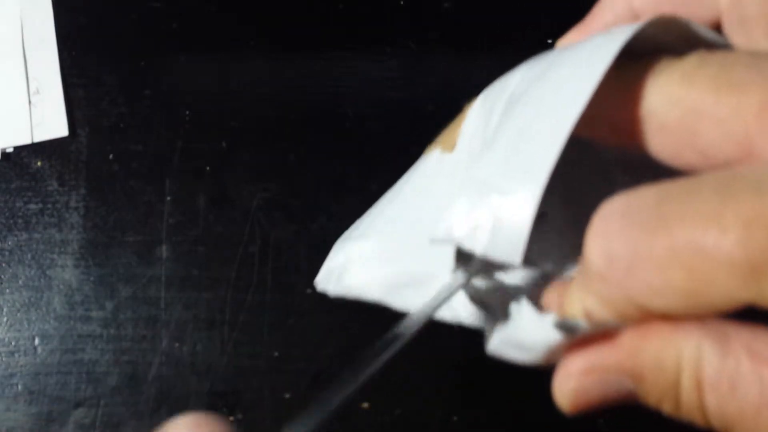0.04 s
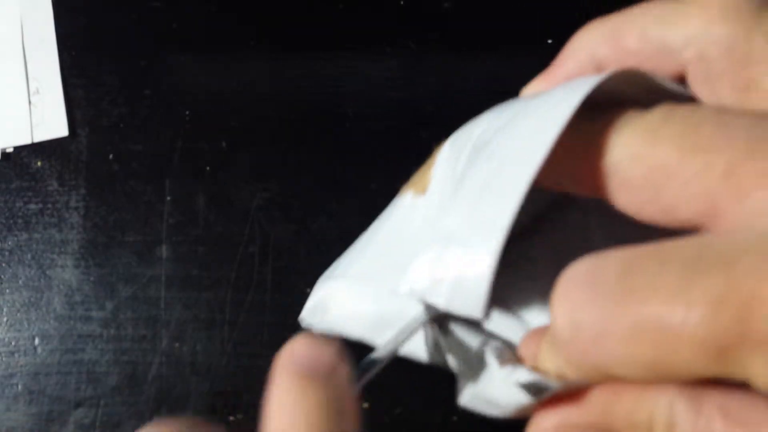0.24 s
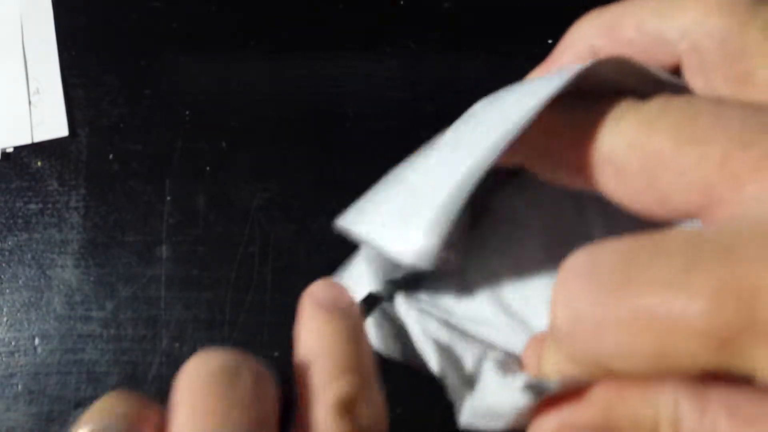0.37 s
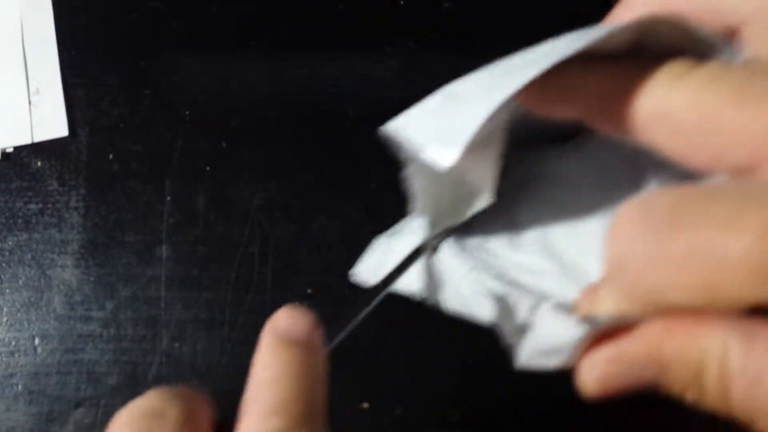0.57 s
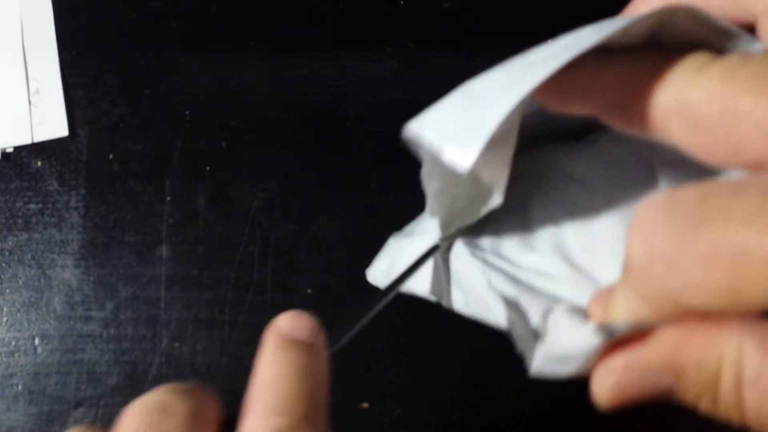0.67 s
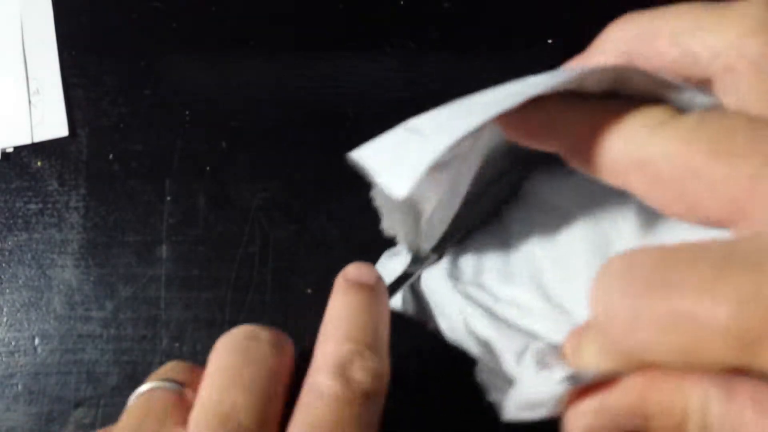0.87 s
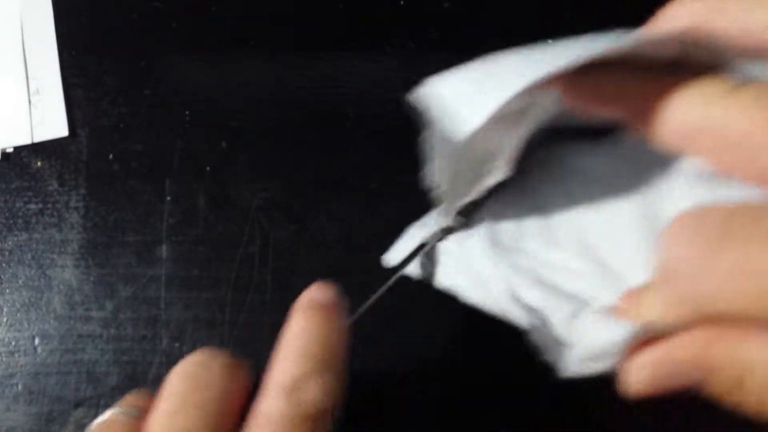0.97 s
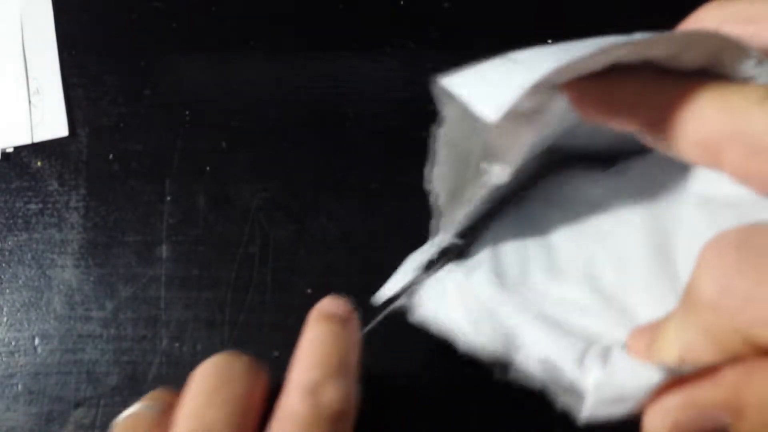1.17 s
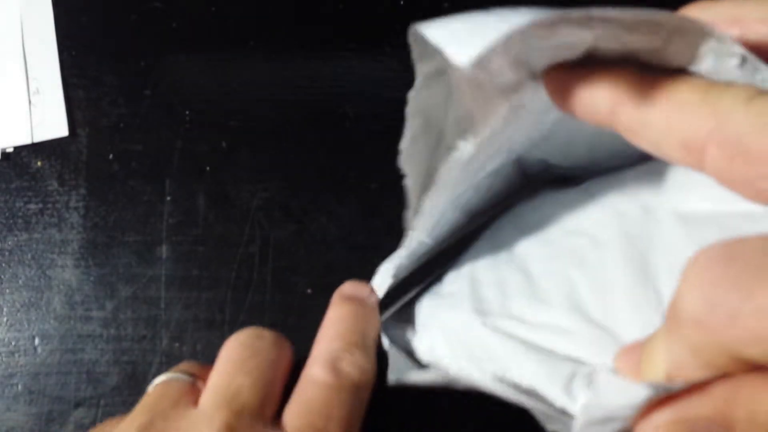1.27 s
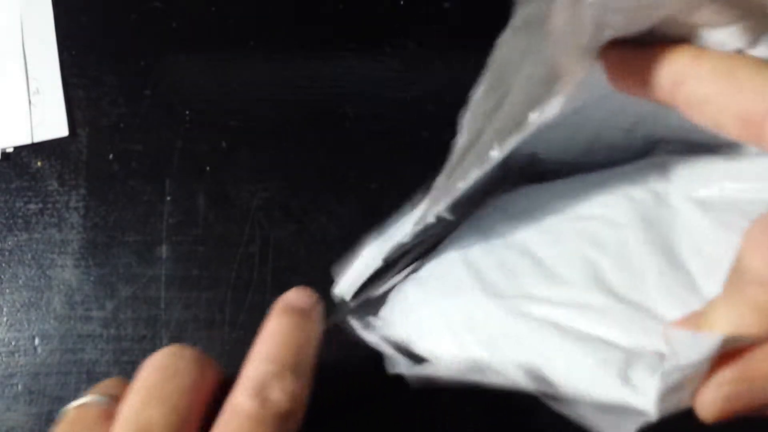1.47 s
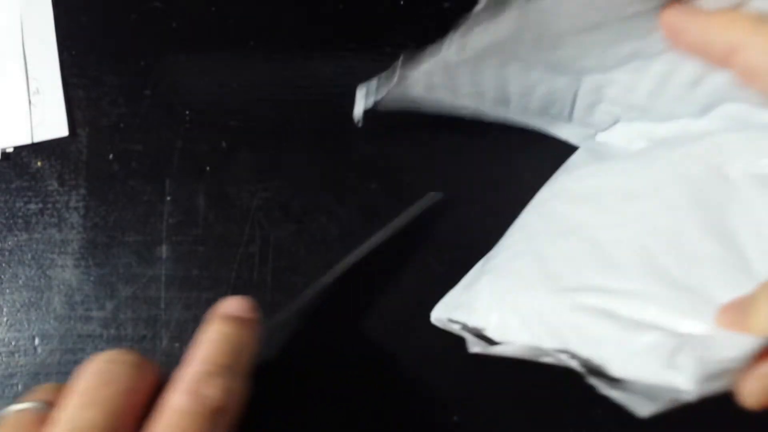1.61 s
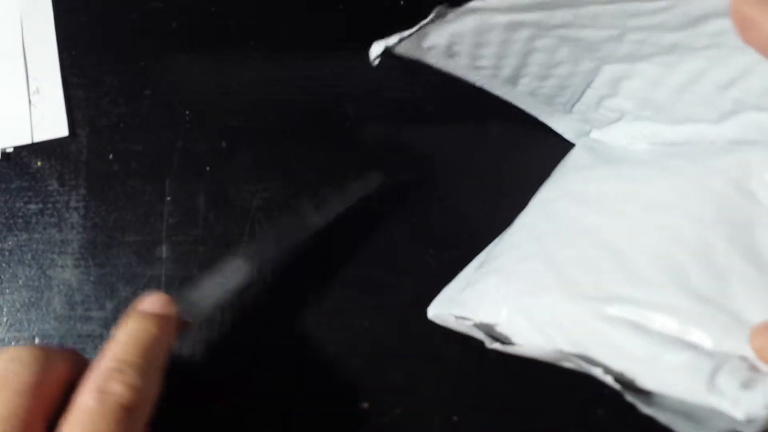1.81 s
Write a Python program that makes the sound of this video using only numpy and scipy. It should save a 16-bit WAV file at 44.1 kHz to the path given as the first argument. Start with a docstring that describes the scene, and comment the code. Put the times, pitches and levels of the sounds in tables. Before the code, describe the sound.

A stiff padded plastic mailer is slit and pulled open on a desk, heard very close in a small room: faint crackle first, then sharp bursts of snaps and hollow pops, ending with a dull knock.

```python
"""A padded plastic mailer is slit with a knife and pulled open on a desk, close by, in a small room.
A faint hush lasts throughout. The first pulls crackle softly; then creases snap in the stiff film,
whole panels buckle with hollow pops and the bag bumps the desk, over crackle, rasp and rumble.
Near the end the blade breaks through the seam with a knock, and a last faint snap follows.
Snaps are shaped noise bursts, pops and bumps decaying sines, and the pulls trains of random clicks."""
import sys
import numpy as np
from scipy import signal
from scipy.fft import rfft, irfft, next_fast_len
from scipy.io import wavfile

SR = 44100
rng = np.random.default_rng(int(sys.argv[2]) if len(sys.argv) > 2 else 0)


def output_pcm(signal):
    """Save a mono or channel-first signal as 16-bit PCM at the path in sys.argv[1].

    Samples are clipped to [-1, 1] before scaling.
    """
    pcm = np.clip(np.atleast_2d(signal).T, -1, 1) * 32767
    wavfile.write(sys.argv[1], SR, np.round(pcm).astype(np.int16))


N = 81585  # samples

# Snapping creases: start_s, relative_level_db, relative_crack_db, decay_s
CREASE_SNAPS = [(0.0277,-31.5,-13,0.0039), (0.045,-29,-5.5,0.0021), (0.2057,-9.5,2.5,.004),
                (0.2291,-9,-2.5,0.0047), (0.2354,-9.5,-4.5,0.0075), (0.2397,-13,2,0.007),
                (0.2656,-8.5,-1,0.0041), (0.278,-14,3,0.0018), (0.3158,-19,12,0.0034),
                (0.331,-25,3.5,0.0034), (0.3384,-15,4,0.0058), (0.35,-25,-8.5,.0005),
                (0.3913,-12.5,-7.5,0.0013), (0.3938,-16,0.5,0.0052), (0.4279,-16.5,2.5,0.006),
                (0.4624,-14,-10,0.0015), (0.4655,-12.5,-10,0.0015), (0.4733,-15,-2,.001),
                (0.5106,-18,-11,0.0021), (0.5234,-15.5,-11.5,0.0021), (0.5377,-14,-8,0.0028),
                (0.55,-15,-4,0.0011), (0.603,-21,-19,0.0017), (0.6705,-14.5,-12,0.0017),
                (0.6785,-22,0,0.0026), (0.712,-26.5,-20,0.00062), (0.762,-10,-11.5,0.0023),
                (0.7751,-8.5,-32,0.0012), (0.7791,-19,-21,.001), (0.7965,-9.5,-10,0.0048),
                (0.806,-10.5,-12,0.0028), (0.8197,-11.5,-3,0.0043), (0.8444,-12.5,2,0.0044),
                (0.8515,-11.5,-7.5,0.0011), (0.869,-12,-28,.0007), (0.8872,-12,-6.5,0.00076),
                (0.968,-15,-20,0.0017), (0.9877,-15,-4.5,.0012), (1.001,-10,-2,0.0046),
                (1.0277,-12,-4,0.0036), (1.0547,-14,-18.5,0.0037), (1.1695,-28,3,0.00022),
                (1.186,-35,-12,.0003), (1.216,-12.5,-7,0.0012), (1.2303,-16.5,-4.5,0.0013),
                (1.244,-8,-13,0.0042), (1.25,-14.5,-13,.0007), (1.264,-6,-14,0.0068),
                (1.2695,-11.5,-26,.0012), (1.283,-11,-30,0.0031), (1.2942,-12.5,-5.5,0.0034),
                (1.2999,-14.5,-2.5,0.0018), (1.365,-21.5,-29,0.0021), (1.5566,-21,4,0.0018),
                (1.5886,-30,-2,0.003), (1.638,-24,-7.5,0.0078), (1.7304,-32.5,-7.5,.001)]
# Level of the top treble in the snaps over time: time_s, relative_level_db
SNAP_EDGE = [(0.27,-11.5), (0.46,-21), (0.67,-7.5), (0.77,-27), (1.05,-11), (1.17,3), (1.27,-7.5)]
# Buckling panels: start_s, relative_level_db, pitch_hz, swell_s
PANEL_POPS = [(0.206,-15,1953,0.0013), (0.267,-25,1050,.003), (0.317,-16,820,0.0023),
              (0.338,-21.5,892,0.0046), (0.43,-25.5,1084,0.0033), (0.462,-21.5,877,0.002),
              (0.5522,-15,1010,0.0015), (0.579,-21,1097,0.0064), (0.607,-19.5,520,0.0037),
              (0.822,-17.5,818,0.0043), (0.84,-15.5,839,0.008), (0.855,-19.5,1100,0.0041),
              (0.956,-20.5,860,0.0017), (0.968,-14.5,910,0.0026), (0.9995,-13,660,0.0033),
              (1.011,-15,1003,.002), (1.019,-14,910,0.0015), (1.027,-8.5,858,0.0023),
              (1.052,-16.5,634,0.0022), (1.053,-15,1223,0.0027), (1.216,-20,1160,0.0032),
              (1.231,-22,850,0.0018), (1.245,-21,1200,0.0035), (1.253,-23.5,907,0.0032),
              (1.269,-22,903,0.0046), (1.283,-22,1215,.003), (1.301,-16.5,1003,0.0016),
              (1.526,-25.5,854,.0025), (1.553,-27,907,0.0013)]
# Bag against desk: start_s, relative_level_db, pitch_hz
DESK_BUMPS = [(0.227,-25,158), (0.314,-28,385), (0.375,-24,194), (0.421,-23.5,294), (0.433,-21,278),
              (0.463,-21,275), (0.554,-18,240), (0.561,-24,115), (0.577,-17,273), (0.589,-22,254),
              (0.608,-22.5,219), (0.67,-24,265), (0.747,-29,224), (0.955,-23,272), (1.007,-16.5,224),
              (1.034,-23,153), (1.054,-18.5,255), (1.075,-30.5,265), (1.362,-43,182), (1.395,-36,198),
              (1.526,-28,216), (1.549,-20.5,200)]
# Partials as the blade breaks through the end of the seam: pitch_hz, relative_level_db
SEAM_KNOCK = [(310,0), (651,-3), (980,-0.5), (1460,-5), (1830,-7.5), (2440,-9)]
# Pulls on the bag: start_s, end_s, relative crackle_db, rasp_db, rumble_db
BAG_PULLS = [(0.02,0.069,-49,-47,-53.5),(0.117,0.214,-48.5,-51.5,-59),(0.211,0.293,-37,-37.5,-39.5),(0.341,0.348,-26.5,-50,-34.5),(0.391,0.451,-27.5,-33,-38),
             (0.538,0.638,-36.5,-34.5,-36.5),(0.676,0.724,-39,-59,-50),(0.765,0.826,-32.5,-32.5,-38),(0.812,0.89,-30,-32,-41.5),(0.953,0.991,-33,-37,-36.5),
             (0.995,1.052,-28.5,-31,-34.5),(1.168,1.216,-43.5,-52,-51),(1.246,1.309,-26.5,-39,-42.5),(1.3,1.344,-39,-61,-52),(1.402,1.476,-38,-49.5,-67),(1.531,1.602,-35,-37,-44.5)]
# Spectrum of the stiff film, in ticks and crackle: frequency_hz, relative_density_db
FILM_SPECTRUM = [(40,-27),(600,-22),(2000,-6),(3500,-7),(5000,-3.5),(6700,-0.5),(8200,-5.5),(11000,-8.5),(13500,-12),(15500,-11.5)]
# Spectrum of the lower part of a snap: frequency_hz, relative_density_db
CRACK_SPECTRUM = [(40,-70),(450,-9.5),(1100,0.5),(1500,-7.5),(1950,0),(2700,-10.5),(3700,-8),(5000,-10.5),(10000,-20.5)]
# Spectrum of the bag under the rasping blade: frequency_hz, relative_density_db
BAG_SPECTRUM = [(40,-50.5),(260,-14),(450,-7.5),(800,0.5),(1150,-1.5),(1500,-1.5),(2000,-6),(3000,-7),(8000,-32)]
# Spectrum of the bag rumbling on the desk: frequency_hz, relative_density_db
RUMBLE_SPECTRUM = [(25,-26),(60,-10),(110,-7),(200,-4),(450,-7.5),(1200,-27)]
# Resonances of the hollow bag: frequency_hz, gain_db
HOLLOW_MODES = [(260,-6),(680,-8),(765,-8),(885,-6),(995,-6),(1112,-6),(1272,-7),(1955,-3)]
# Stereo width, as gain of the side signal: frequency_hz, gain_db
SIDE_GAIN = [(60,-16),(300,-17),(700,-15),(1400,-6),(2800,-1),(6000,0)]
# Balance of the bag's place off centre: frequency_hz, left_minus_right_db
OFF_CENTRE = [(500,0.5),(1300,0.5),(2100,-4),(3300,-5),(5500,-11),(9000,-7.5),(15000,3.5)]
# Spectrum of the hush of the room: frequency_hz, relative_density_db
HUSH_SPECTRUM = [(25,-14),(60,-9.5),(110,-4),(230,-20.5),(1000,-25.5),(6000,-22.5),(16000,-33.5)]

EVENT_S, LEVEL_WINDOW_S = .08, .003  # length of one event; span over which its energy sets its level
SCATTER_DB, SCATTER_DECAY_S = -4, .009  # quick reflections from desk and hands
SNAP_DB, CRACK_DB = -11, 2  # offsets added to the table's levels
RING_HZ, RING_SPREAD = 6570, 0.1  # centre of the crease rings; spread as natural log of frequency
RING_WIDTH_HZ, RING_DB = 380, 0
POP_DB, BUMP_DB, KNOCK_DB = -4.5, -6, -22.5  # offsets added to the tables' levels
BUMP_SWELL_S, KNOCK_SWELL_S = 0.0036, 0.0029
KNOCK_S = 1.5872
BLUR_DB = -1.5  # narrow-band noise relative to the tone
PULL_ATTACK_S, PULL_RELEASE_S = 0.0078, 0.017  # exponential time constants
CRACKLE_PER_S, RASP_PER_S, RUMBLE_PER_S = 3500, 1500, 470  # mean clicks per second
HOLLOW_T60_S = .07
ROOM_DB, ROOM_T60_S = -9, 0.2
LEFT_LAG_S = .00004
HUSH_DB = -60  # rms of mid, and of side before its width is set
CUTOFF_HZ = 15600


def from_db(db):
    """Logarithmic scale: decibels become an amplitude gain."""
    return 10 ** (np.asarray(db) / 20)


def unit(x):
    """Normalisation: each channel is scaled to energy 1."""
    return x / np.sqrt(np.sum(x ** 2, axis=-1, keepdims=True) + 1e-20)


def colour(x, points, power=1):
    """Minimum phase: a causal filter is built from its magnitude by folding the cepstrum."""
    size = 2 * next_fast_len(x.shape[-1])
    hz, db = np.transpose(points)
    bins_hz = np.arange(size // 2 + 1) * SR / size
    curve_db = np.interp(np.log(bins_hz + 1), np.log(hz), db)
    cepstrum = irfft(np.log(from_db(curve_db * power)))
    cepstrum[1:size // 2] *= 2
    cepstrum[size // 2 + 1:] = 0
    response = np.exp(rfft(cepstrum))
    return irfft(rfft(x, size) * response)[..., :x.shape[-1]]


def resonate(x, hz, width_hz):
    """Damped resonance: a pole pair passes a narrow band, with gain 1 at its peak."""
    radius = np.exp(-np.pi * width_hz / SR)
    zeros = np.array([1, 0, -1]) * (1 - radius * radius) / 2
    poles = [1, -2 * radius * np.cos(2 * np.pi * hz / SR), radius * radius]
    return signal.lfilter(zeros, poles, x + 1e-18)


def burst(decay_s, spiky_db):
    """Stick-slip: a dying run of uneven micro-slips plus nearby reflections, as mid and side."""
    t = np.arange(int(EVENT_S * SR)) / SR
    slips, scatter = rng.standard_normal((2, 2, len(t)))
    uneven = from_db(spiky_db * np.clip(rng.standard_normal(len(t)), -2, 2))
    direct = unit(slips * uneven * np.exp(-t / decay_s))
    # the reflections are drawn anew for each spot on the bag
    reflections = unit(scatter * np.exp(-t / SCATTER_DECAY_S))
    return direct + from_db(SCATTER_DB) * reflections


def swing(hz, swell_s):
    """Damped vibration: a patch of bag swells into a few cycles, blurred by slips of the film."""
    t = np.arange(int(EVENT_S * SR)) / SR
    tone = unit(t * np.exp(-t / swell_s) * np.sin(2 * np.pi * hz * t))
    slips = burst(2 * swell_s, spiky_db=2)
    blur = unit(resonate(resonate(slips, hz, hz / 2), hz, hz))
    mid_only = np.array([[1], [0]])
    return unit(tone * mid_only + from_db(BLUR_DB) * blur)


def grains(per_s, spread_db, spectrum):
    """Random impulses: tiny clicks of uneven size excite a spectrum, as mid and side of rms 1."""
    happens = rng.random(N) < per_s / SR
    sizes = happens * from_db(spread_db * np.minimum(rng.exponential(1, N), 3))
    clicks = sizes * rng.choice([-1, 1], (2, N))
    return unit(colour(clicks, spectrum)) * np.sqrt(N)


def add(out, s, db, sound):
    """Superposition: a sound is added at its time, its level set for energy 1 in the level window."""
    i = max(int(s * SR), 0)
    gain = from_db(db) * np.sqrt(LEVEL_WINDOW_S * SR)
    out[:, i:i + sound.shape[1]] += gain * sound[:, :N - i]


def creases():
    """Snap-through: each crease gives a bright tick, short ring, thin top edge and lower crack."""
    out = np.zeros((2, N))
    for s, db, crack_db, decay_s in CREASE_SNAPS:
        slips = burst(decay_s, spiky_db=13)
        # each crease rings at a pitch of its own
        ring_hz = RING_HZ * np.exp(RING_SPREAD * rng.uniform(-1.05, 1))
        ring = unit(resonate(slips, ring_hz, RING_WIDTH_HZ))
        # the second difference tilts noise towards the treble
        edge = unit(np.diff(burst(decay_s, spiky_db=8), 2, prepend=np.zeros((2, 2))))
        edge_db = np.interp(s, *np.transpose(SNAP_EDGE))
        tick = unit(unit(colour(slips, FILM_SPECTRUM)) + from_db(RING_DB) * ring)
        crack = unit(colour(burst(2 * decay_s, spiky_db=3), CRACK_SPECTRUM))
        snap = tick + from_db(edge_db) * edge + from_db(CRACK_DB + crack_db) * crack
        add(out, s, db + SNAP_DB, snap)
    return out


def pops():
    """Buckling: each panel gives way and swings briefly at its own pitch."""
    out = np.zeros((2, N))
    for s, db, hz, swell_s in PANEL_POPS:
        add(out, s, db + POP_DB, swing(hz, swell_s))
    return out


def bumps():
    """Impact: the bag strikes the desk and gives a low damped vibration."""
    out = np.zeros((2, N))
    for s, db, hz in DESK_BUMPS:
        add(out, s, db + BUMP_DB, swing(hz, BUMP_SWELL_S))
    return out


def seam_knock():
    """Sudden release: the blade breaks through the seam and several partials sound at once."""
    out = np.zeros((2, N))
    for hz, db in SEAM_KNOCK:
        add(out, KNOCK_S, db + KNOCK_DB, swing(hz, KNOCK_SWELL_S))
    return out


def pulling():
    """Friction: each pull makes film crackle, blade rasp and bag rumble on the desk, then dies away."""
    t, power = np.arange(N) / SR, 0
    for start, end, *levels_db in BAG_PULLS:
        before, after = np.maximum(start - t, 0), np.maximum(t - end, 0)
        shape = np.exp(-before / PULL_ATTACK_S - after / PULL_RELEASE_S)
        power = power + np.outer(from_db(levels_db), shape) ** 2
    # overlapping pulls add in power
    crackle, rasp, rumble = np.sqrt(power) * from_db([[-4], [-4], [-3]])
    return (crackle * grains(CRACKLE_PER_S, 3.8, FILM_SPECTRUM)
            + rasp * grains(RASP_PER_S, 0.99, BAG_SPECTRUM)
            + rumble * grains(RUMBLE_PER_S, 0.33, RUMBLE_SPECTRUM))


def hollow(x):
    """Cavity resonance: the half-open bag rings on briefly after each push."""
    width_hz = np.log(1000) / (np.pi * HOLLOW_T60_S)  # bandwidth that gives a 60 dB decay in T60
    return x + sum(from_db(db) * resonate(x, hz, width_hz) for hz, db in HOLLOW_MODES)


def room(x):
    """Reverberation: the small room's tail is exponentially decaying noise, convolved with the sound."""
    t = np.arange(SR // 2) / SR
    envelope = np.clip(t / 0.0011, 0, 1) * from_db(-60 * t / ROOM_T60_S)
    tail = unit(rng.standard_normal((2, len(t))) * envelope)
    return x + from_db(ROOM_DB) * signal.fftconvolve(x, tail, axes=1)[:, :N]


def left_right(x):
    """Interchannel coherence: mid and side make two channels, alike in the bass, apart in the treble."""
    mid, side = x
    return mid + colour(side, SIDE_GAIN) * np.array([[1], [-1]])


def lean(left, right):
    """Interaural cues: off centre, most treble is louder on the right and the left lags slightly."""
    left = np.interp(np.arange(N) - LEFT_LAG_S * SR, np.arange(N), left)
    # half of the level difference goes to each side
    return np.array([colour(left, OFF_CENTRE, .5), colour(right, OFF_CENTRE, -.5)])


def hush():
    """Stationary noise: the hush of the room is random noise with a fixed spectrum."""
    noise = colour(rng.standard_normal((2, N)), HUSH_SPECTRUM)
    return left_right(from_db(HUSH_DB) * np.sqrt(N) * unit(noise))


def scene():
    """Source, resonator, room: the mailer rings in its own hollow, over the hush."""
    handling = creases() + pops() + bumps() + seam_knock() + pulling()
    mailer = lean(*left_right(room(hollow(handling))))
    return mailer + hush()


def record(dry):
    """Saturation and band limiting: the tallest peaks are rounded, then the top is cut."""
    top = .95
    rounded = top * np.tanh(dry / top)
    low_pass = signal.ellip(10, .1, 80, CUTOFF_HZ, fs=SR, output="sos")
    return signal.sosfilt(low_pass, rounded)


dry = scene()
out = record(dry)
output_pcm(out)
```